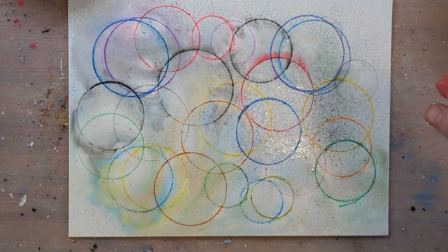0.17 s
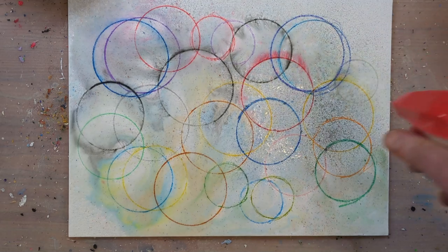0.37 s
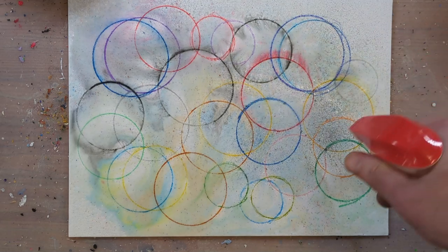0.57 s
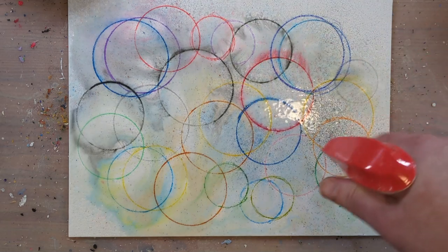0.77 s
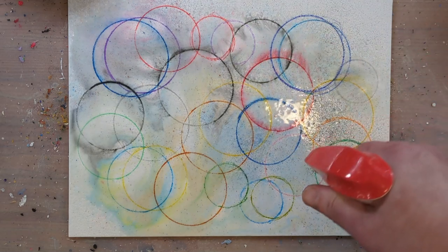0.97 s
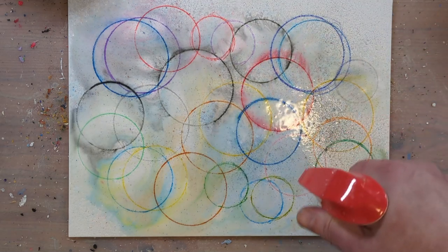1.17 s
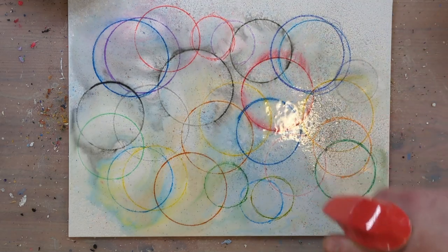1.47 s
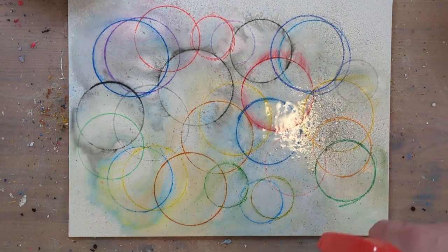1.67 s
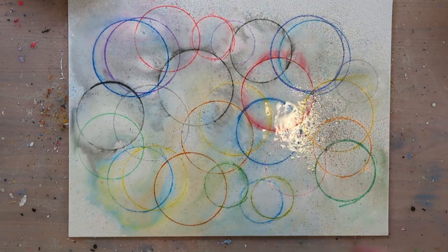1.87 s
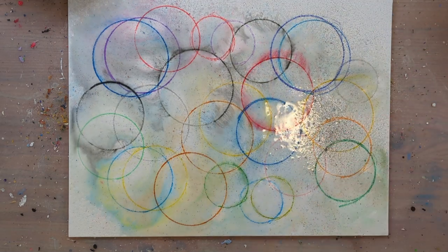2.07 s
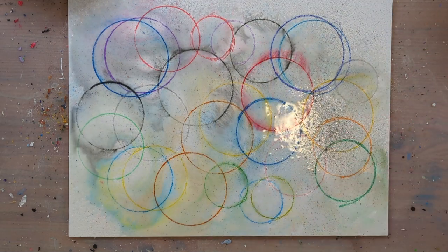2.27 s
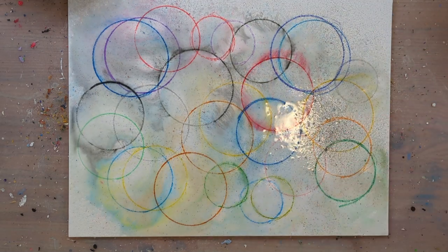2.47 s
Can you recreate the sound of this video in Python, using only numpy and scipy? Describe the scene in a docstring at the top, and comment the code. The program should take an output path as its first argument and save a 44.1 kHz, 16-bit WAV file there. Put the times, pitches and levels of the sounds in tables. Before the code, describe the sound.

A hand spray bottle pumped four times, each short hiss ending in a hard plastic trigger clack

```python
"""Hand spray bottle

A spray bottle is pumped four times above a table, close to a stereo microphone in a quiet room.
Each squeeze hisses (noise with random droplet clicks) and hums in the hollow head (resonant noise).
Each release clacks, bounces and rattles: clusters of contacts ring modes of the plastic head and bottle.
Behind it lie air noise, a low wavering hum and thin high whines.
"""
import sys
import numpy as np
from scipy import signal
from scipy.fft import rfft, irfft
from scipy.io import wavfile
from scipy.ndimage import uniform_filter1d

SR = 44100
rng = np.random.default_rng(int(sys.argv[2]) if len(sys.argv) > 2 else 0)


def how_loud(loudness_db):
    """Turn decibels into a plain amplitude multiplier (0 dB gives 1, 20 dB gives 10)."""
    steps = np.asarray(loudness_db, float) / 20
    return 10 ** steps


def store_pcm(level_fs):
    """Save levels as 16-bit WAV."""
    pcm = np.round(np.clip(level_fs, -1, 1) * 32767).astype(np.int16)
    wavfile.write(sys.argv[1], SR, np.atleast_2d(pcm).T)


N = 114660  # samples

# room air spectrum: (frequency [Hz], density [dB])
AIR_SPECTRUM = [(15, -44), (25, -17), (60, -6), (108, -6.5), (192, -23.5), (266, -25.5), (700, -30),
                (1220, -23.5), (2210, -25), (6550, -32.5), (8000, -28.5), (9850, -33), (12000, -39.5),
                (15200, -43), (16500, -75)]
# whine frequencies [Hz]
WHINE_HZ = [7643, 8356, 9049, 9188]
# whines, same order: (level [dB rms], pan [dB], left phase lead [rad])
WHINES = [(-65, 5, 1.75), (-70, 5, 1.4), (-80, 16, 1.9), (-79, -11, 1.6)]

# rattle during each refill: (time [s], start level [dB], decay t60 [s], bright rel [dB], bottle rel [dB])
REFILLS = [(0.469, -33.5, 0.24, -10, -15), (0.496, -34, 0.064, 1, -23), (0.955, -29.5, 0.17, -3.5, -26),
           (0.983, -43, 0.047, 8, -1), (1.416, -32.5, 0.17, -12.5, -15), (1.895, -35, 0.18, -3, -7),
           (1.923, -49, 0.049, -3, -3)]
# rattle spectrum: (frequency [Hz], density [dB])
RATTLE_SPECTRUM = [(350, -62), (600, 8.5), (1560, 6), (1980, 11), (2610, 1.5), (5290, 8), (7910, -18),
                   (14800, -20), (15800, -20), (16500, -42)]

# plastic head modes in three bands: (frequency [Hz], level [dB], decay t60 [s])
BODY_MODES = [(1043, -4.5, 0.012), (1104, -11.5, 0.045), (1317, -5.5, 0.018), (1685, -2, 0.013),
              (2200, -0.5, 0.0075), (2598, -0.5, 0.011), (2814, -7, 0.0081)]
MIDDLE_MODES = [(3200, -2.5, 0.0063), (3420, 0, 0.0068), (4450, -6.5, 0.014), (4850, -7, 0.012),
                (5940, -4.5, 0.0028)]
BRIGHT_MODES = [(6670, -8, 0.0052), (7570, -3.5, 0.011), (7970, -1.5, 0.011), (8655, -1.5, 0.0071),
                (10560, -22, 0.0055)]
# bottle modes: (frequency [Hz], level [dB], decay t60 [s])
BOTTLE_MODES = [(181, -19, 0.065), (251.2, -32, 0.18), (388, -9.5, 0.014), (475.7, -21, 0.081),
                (703, -34, 0.12)]

# faint ticks of the handled bottle and, at 0.338, 0.825 and 1.7 s, of the sputtering jet, levels before the
# common trim: # (time [s], level [dB], body rel [dB], middle rel [dB], bright rel [dB], pan [dB])
TICKS = [(0.087, -46.5, -17, -1, 0.5, 0), (0.172, -29.5, -6.5, -2, -26, 7), (0.372, -29, -9.5, -10, -11, 5),
         (0.338, -29, -13, -3.5, -18, -3), (0.703, -21.5, -9.5, -14.5, -6.5, 18),
         (0.825, -28, -6.5, -8, -22, 1), (0.865, -31, -11, -7.5, -15, 18),
         (1.132, -31.5, -6.5, -5, -24, 17), (1.318, -28, -10, -10, -20, 12.5),
         (1.7, -22, -6, -20, -6.5, 9.5), (1.818, -32, -8, -7, -26, 3), (2.307, -34.5, -9, -13.5, -16, -6),
         (2.435, -38.5, -10, -8, -5, 3), (2.449, -34, -15.5, -6, -9.5, -11.5),
         (2.463, -55, -21, 8, -21, 10)]
# trigger blows, levels before the common trim:
# (time [s], level [dB], body rel [dB], middle rel [dB], bright rel [dB], pan [dB], body tilt [dB/octave])
BLOWS = [(0.4705, -5.5, -13.5, -35, -22, -1, 3), (0.475, -17, -29, -36, -39, 24.5, -6),
         (0.499, -14, -20.5, -12, -5.5, -14, -8.5), (0.503, -24, -9.5, -4, -8, 7, 0.1),
         (0.511, -23.5, -40, -5, -12, 6, -2), (0.9515, -5, -12, -14, -14, 0, 6),
         (0.958, -18, -23.5, -8, -22, 11, -14), (0.9815, -13.5, -16, -8, -9, -6.5, -12),
         (0.987, -21.5, -16, -3.5, -14, 6, 3), (0.993, -22.5, -13.5, -3.5, -14, 4, 9),
         (1.412, -10, -10, -12.5, -15, 1.5, 5), (1.417, -23, -29, -10, -28, -13, 7),
         (1.437, -22.5, -7, -20, -35, 2, 0.1), (1.459, -27, -10, -5.5, -14.5, -2, -10),
         (1.895, -26.5, -2.5, -20, -29, 0.5, -10.5), (1.902, -18, -18, -5.5, -2.5, -5.5, -10),
         (1.907, -29, -18, -4, -14, 16, 3), (1.9245, -19.5, -9.5, -10, -5, -1, -3.5),
         (1.943, -34, -29, -12, -11, 4, 0.1)]

# pump strokes, one table each, before the jet trim: (time [s], jet level [dB], mist patter rel [dB])
STROKES = [
    [(0.13, -81, -18.5), (0.16, -52.5, -39), (0.178, -43.5, -28), (0.248, -41, -22.5), (0.362, -54.5, -22),
     (0.44, -83, -18)],
    [(0.612, -71, -20), (0.682, -40.5, -30.5), (0.72, -40.5, -16), (0.856, -55, -35), (0.93, -84, -7)],
    [(1.1, -85, -19), (1.132, -49.5, -22), (1.19, -39.5, -24.5), (1.226, -41.5, -25.5), (1.39, -75, -12)],
    [(1.59, -79, -27), (1.618, -49.5, -18), (1.636, -44, -28), (1.66, -40.5, -19), (1.694, -42, -14.5),
     (1.86, -71, -37)],
]
# jet spectrum: (frequency [Hz], density [dB])
JET_SPECTRUM = [(350, -26), (600, -26.5), (749, -25), (910, -4), (1200, -1), (2150, -1.5), (2610, -5),
                (5590, -3), (14800, -4), (15800, -7), (16500, -42)]
# jet pan per stroke, left minus right [dB]
JET_PAN_DB = [5.5, 3.5, 4.1, 4.1]
# gain of the jet part common to both channels: (frequency [Hz], gain [dB])
JET_COMMON = [(300, -52), (700, 8.5), (1500, -16), (3000, -19), (17000, -31)]
# colour of the left jet channel: (frequency [Hz], gain [dB])
JET_LEFT_COLOUR = [(300, 16), (1000, -3), (3000, 6), (8000, 0), (17000, -9.5)]
# spectrum of mist landing on the board: (frequency [Hz], density [dB])
PATTER_SPECTRUM = [(90, 3), (150, -4.5), (300, -7), (650, -3.5), (1000, -22)]
# hollow note of the head, one table per stroke: (time [s], level [dB])
HOLLOW_NOTE = [
    [(0.14, -97), (0.164, -70), (0.176, -55.5), (0.228, -73), (0.25, -75), (0.27, -69), (0.33, -58.5),
     (0.364, -69), (0.44, -64.5)],
    [(0.63, -72.5), (0.666, -58), (0.7, -45.5), (0.734, -57.5), (0.768, -48), (0.846, -54), (0.874, -57.5),
     (0.918, -66), (0.936, -59), (0.952, -63)],
    [(1.11, -79), (1.14, -62), (1.158, -43), (1.208, -57), (1.232, -44), (1.264, -51), (1.298, -63),
     (1.32, -58.5), (1.39, -67.5)],
    [(1.6, -103), (1.634, -50), (1.648, -41.5), (1.662, -48), (1.696, -62), (1.756, -51), (1.79, -62.5),
     (1.87, -68)],
]


def unit(x):
    """Scale to rms 1."""
    return x / np.sqrt(np.mean(x ** 2))


def colour(x, points):
    """Shape a spectrum by (frequency [Hz], gain [dB]) points, log-frequency interpolation."""
    hz, db = np.array(points, float).T
    f = np.maximum(np.arange(N // 2 + 1) * SR / N, 1)
    gain_db = np.interp(np.log(f), np.log(hz), db, left=-80, right=-80)
    return irfft(rfft(x) * how_loud(gain_db), N)


def resonance(x, hz, width_hz):
    """Two identical resonators in series; width_hz is that of each."""
    b, a = signal.iirpeak(hz, hz / width_hz, fs=SR)
    return signal.lfilter(b, a, signal.lfilter(b, a, x))


def flicker(rate_hz):
    """Smoothed random steps at rate_hz, rms about 1."""
    k = int(SR / rate_hz)
    steps = np.repeat(rng.standard_normal(N // k + 1), k)
    return unit(uniform_filter1d(steps, k)[:N])


def clicks(per_s, scatter_db):
    """Random clicks of either sign, a few much stronger, rms 1."""
    chance = rng.random(N)
    strength = np.minimum(rng.exponential(size=N), 3)
    sign = np.sign(rng.standard_normal(N))
    return unit((chance < per_s / SR) * sign * how_loud(scatter_db * strength))


def gain(tables, column=0):
    """Gain over time, summed over level tables; column > 0 is relative to the level."""
    t, out = np.arange(N) / SR, np.zeros(N)
    for rows in tables:
        rows = np.array(rows, float)
        db = rows[:, 1]
        if column:
            db = db + rows[:, 1 + column]
        out += how_loud(np.interp(t, rows[:, 0], db, left=-120, right=-120))
    return out


def place(x, pan_db):
    """Pan to two channels; pan_db is left minus right."""
    return x * how_loud(np.array([pan_db / 2, -pan_db / 2]).reshape(2, -1))


def room_tone():
    """Air noise, more alike left and right in the bass; a wavering hum; faintly unsteady whines."""
    air_db, hum_db = -68, -69.5
    t = np.arange(N) / SR
    mid = colour(rng.standard_normal(N), AIR_SPECTRUM)
    side = colour(rng.standard_normal(N), AIR_SPECTRUM)
    # air_db refers to the 200-7000 Hz band of mid
    band = signal.sosfilt(signal.butter(4, [200, 7000], "band", fs=SR, output="sos"), mid)
    side = colour(side, [(20, -13), (120, -14), (400, -2), (1500, -1), (17000, 0.1)])
    air = place(mid + side * np.array([[1], [-1]]), 1.1) * how_loud(air_db) / np.std(band)
    hum = how_loud(hum_db) * unit(resonance(rng.standard_normal(N), hz=99.7, width_hz=5.4))
    out = air + hum
    for hz, (db, pan_db, lead_rad) in zip(WHINE_HZ, WHINES):
        phase = 2 * np.pi * hz * t + 0.14 * flicker(26)
        tone = np.sin(phase + lead_rad * np.array([[1], [0]]))
        out = out + place(np.sqrt(2) * how_loud(db + 0.17 * flicker(35.0)) * tone, pan_db)
    return out


def refill_rattle():
    """Dense tiny knocks of spring and valve ring head and bottle, after a faint trigger scrape."""
    knocks_per_s, scatter_db = 2100, 2.5
    scrape_s, scrape_db = 0.017, -55
    t = np.arange(N) / SR
    s, db, t60, bright_db, bottle_db = np.array(REFILLS).T[:, :, None]
    fade = how_loud(db - 60 * np.maximum(t - s, 0) / t60) * (t > s)
    first = np.diff(s, axis=0, prepend=0) > .1  # first clack of each release
    fade = fade + first * how_loud(scrape_db) * (t > s - scrape_s) * (t <= s)
    fade_all = fade.sum(axis=0)
    fade_bright = (fade * how_loud(bright_db)).sum(axis=0)
    fade_bottle = (fade * how_loud(bottle_db)).sum(axis=0)

    shared = clicks(knocks_per_s, scatter_db)
    channels = []
    for _ in range(2):
        source = shared + 1.08 * clicks(knocks_per_s, scatter_db)
        head = sum(how_loud(db) * resonance(source, hz, 9 / t60) for hz, db, t60 in BODY_MODES + MIDDLE_MODES)
        rattle = unit(unit(colour(source, RATTLE_SPECTRUM)) + 1.06 * unit(head))
        bright = unit(resonance(source, 7390, 2700))
        channels.append(rattle * fade_all + bright * fade_bright)
    bottle = sum(how_loud(db) * resonance(shared, hz, 4 / t60) for hz, db, t60 in BOTTLE_MODES)
    return place(np.array(channels), -2) + unit(bottle) * fade_bottle


def ring(modes, t, chance, tilt_db=0):
    """Damped sine modes, each with random strength and slight detuning."""
    hz, db, t60 = np.array(modes).T[:, :, None]
    strength, detune = chance[:, :len(modes), None]
    db = db + tilt_db * np.log2(hz / np.median(hz)) + 1.5 * strength
    sign = (-1) ** np.arange(len(modes))[:, None]
    tone = np.sin(2 * np.pi * hz * (1 + 0.0056 * detune) * t)
    return np.sum(sign * how_loud(db) * tone * np.exp(-np.log(1000) * t / t60), axis=0)


def crunch(contact_s):
    """Small contacts common to both channels plus a set per channel, with one main contact."""
    count, main_strength, main_s, width = 8, 1.22, .0015, 1.27
    hits = np.zeros((3, 512))
    # gamma(2): mean delay is twice contact_s
    when = np.minimum(rng.gamma(2, size=(3, count)) * contact_s * SR, 511).astype(int)
    for k in range(3):
        hits[k, when[k]] = rng.choice([-1, 1], count) * (.5 + rng.random(count))
    hits /= np.sqrt(np.sum(hits ** 2, axis=1, keepdims=True))
    hits[0, int(main_s * SR)] = main_strength
    hits /= np.hypot(1, main_strength)
    return hits[0] + width * hits[1:]


def knocks(rows, trim_db, contact_s, bottle_db, lead_s=0):
    """Each knock is a crunch of contacts that rings head and bottle, starting lead_s early."""
    out, t = np.zeros((2, N + 8192)), np.arange(4096) / SR
    crack = how_loud(2.5) * signal.lfilter(*signal.butter(2, 8900, fs=SR), t == 0)
    head_highpass = signal.butter(4, 760, "high", fs=SR, output="sos")
    for s, level_db, body_db, middle_db, bright_db, pan_db, *tilt_db in rows:
        chance = rng.standard_normal((4, 2, 7))
        head = crack + how_loud(body_db) * ring(BODY_MODES, t, chance[0], sum(tilt_db))
        head = head + how_loud(middle_db) * ring(MIDDLE_MODES, t, chance[1])
        head = head + how_loud(bright_db) * ring(BRIGHT_MODES, t, chance[2])
        head = signal.sosfilt(head_highpass, head)
        knock = signal.fftconvolve(crunch(contact_s), head[None], axes=1)[:, :len(t)]
        bottle = ring(BOTTLE_MODES, t, chance[3]) * (1 - np.exp(-t / 0.0066))  # soft onset
        knock = knock + how_loud(body_db + bottle_db) * bottle
        i = int((s - lead_s) * SR)
        out[:, i:i + len(t)] += place(how_loud(level_db + trim_db) * knock, pan_db)
    return out[:, :N]


def faint_ticks():
    """Soft ticks of the handled bottle and the sputtering jet, spread wider in time than the blows."""
    return knocks(TICKS, trim_db=-8, contact_s=0.001, bottle_db=-1, lead_s=0.002)


def trigger_blows():
    """The released plastic trigger clacks back and bounces."""
    return knocks(BLOWS, trim_db=0.5, contact_s=.0007, bottle_db=3.5)


def jet():
    """Turbulence noise plus droplet clicks, coloured, rms 1."""
    turbulence = rng.standard_normal(N)
    droplets = clicks(per_s=4700, scatter_db=2)
    return unit(colour(turbulence + 0.75 * droplets, JET_SPECTRUM))


def nozzle_hiss():
    """Partly common stereo jet that sputters and follows the strokes."""
    trim_db, sputter_db = 3.5, 1.5
    common = colour(jet(), JET_COMMON)
    pair = np.array([colour(jet() + common, JET_LEFT_COLOUR), jet() + common])
    stroke_s = [rows[0][0] + .1 for rows in STROKES]
    pan_db = np.interp(np.arange(N) / SR, stroke_s, JET_PAN_DB)
    level = gain(STROKES) * how_loud(trim_db + sputter_db * flicker(59.05))
    return pair * place(level, pan_db)


def hollow_head():
    """Noise resonating in the hollow head: a narrow note, a wider airy one and a fluttering overtone."""
    hollow_hz = 920.5
    evenness = 0.47  # 0 swells like noise, 1 holds its level
    note = resonance(rng.standard_normal(N), hollow_hz, width_hz=64)
    envelope = uniform_filter1d(np.abs(note), SR // 200)
    airy = unit(resonance(rng.standard_normal(N), hollow_hz, width_hz=263))
    hollow = (unit(note / envelope ** evenness) + 0.5 * airy) * how_loud(1.5 * flicker(40.24))
    overtone = unit(resonance(rng.standard_normal(N), 1740, width_hz=210))
    hollow = hollow + overtone * how_loud(-11 + 7 * flicker(25.1))
    return place(hollow * gain(HOLLOW_NOTE), 2.1)


def mist_patter():
    """Mist landing on the board: low noise, independent left and right."""
    patter = np.array([unit(colour(rng.standard_normal(N), PATTER_SPECTRUM)) for _ in range(2)])
    return place(patter * gain(STROKES, column=1), 9.2)


def spray():
    """Jet hiss, the head's hollow note and mist patter of the four squeezes."""
    return nozzle_hiss() + hollow_head() + mist_patter()


def table_and_wall_echo(near):
    """Echo as convolution with decaying noise; bass and treble decay separately."""
    echo_db, rise_s, low_t60_s, treble_t60_s = -11.5, 0.01, 0.18, 0.2
    t = np.arange(SR // 2) / SR
    noise = rng.standard_normal((2, len(t)))
    noise = signal.lfilter(*signal.butter(2, 390, "high", fs=SR), noise)
    low = signal.lfilter(*signal.butter(1, 3000, fs=SR), noise)
    low_decay = np.exp(-np.log(1000) * t / low_t60_s)
    treble_decay = np.exp(-np.log(1000) * t / treble_t60_s)
    tail = (low * low_decay + (noise - low) * treble_decay) * np.minimum(t / rise_s, 1)
    tail = tail / np.sqrt(np.sum(tail ** 2, axis=1, keepdims=True))
    return how_loud(echo_db) * signal.fftconvolve(near, tail, axes=1)[:, :N]


def scene():
    """The bottle, its echo from table and walls, and the room tone."""
    near = spray() + trigger_blows() + faint_ticks() + refill_rattle()
    return near + table_and_wall_echo(near) + room_tone()


def top_cut(x):
    """Nothing passes above the cut-off."""
    return signal.sosfilt(signal.butter(12, 16990, fs=SR, output="sos"), x)


def record(dry):
    """The microphone drops the deepest bass and the top treble."""
    mix = signal.sosfilt(signal.butter(4, 48, "high", fs=SR, output="sos"), dry)
    mix = signal.sosfilt(signal.ellip(6, .3, 50, 15900, fs=SR, output="sos"), mix)
    return top_cut(mix)


dry = scene()
out = record(dry)
store_pcm(out)
```